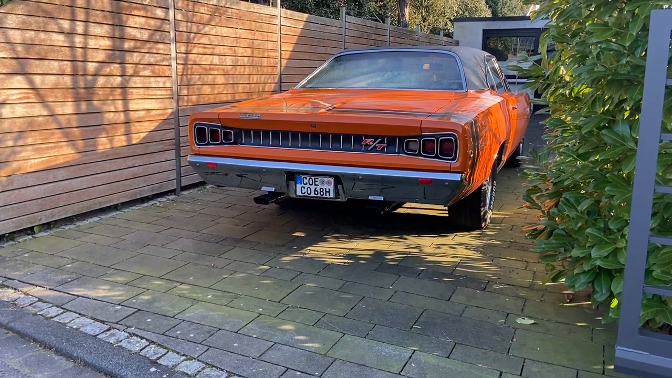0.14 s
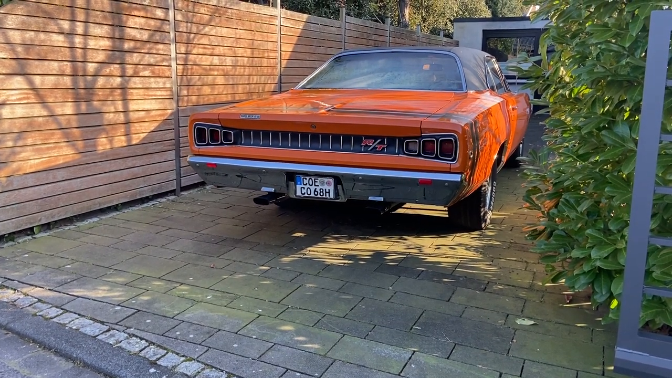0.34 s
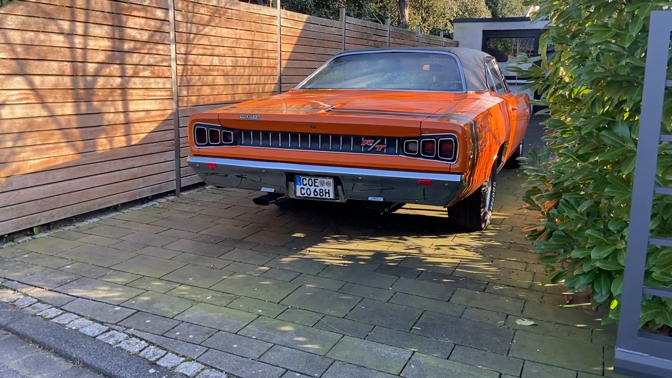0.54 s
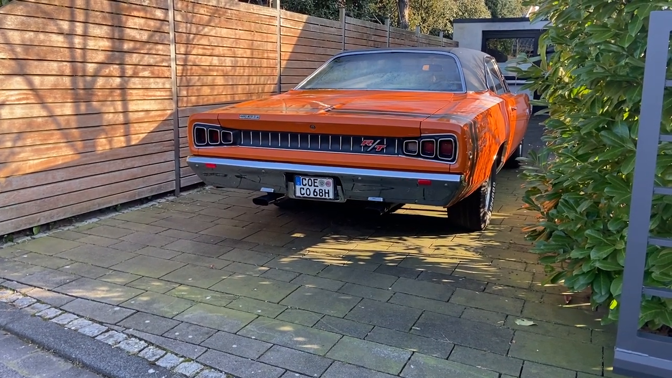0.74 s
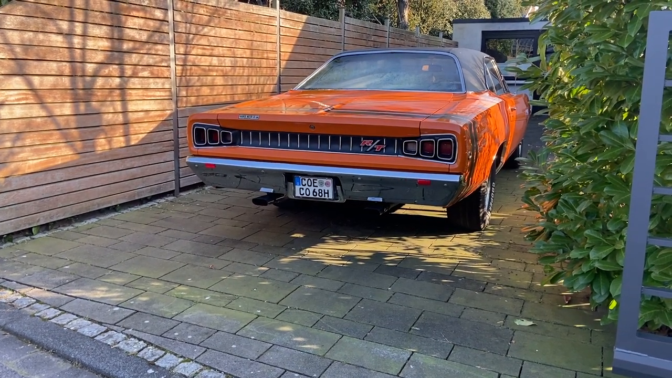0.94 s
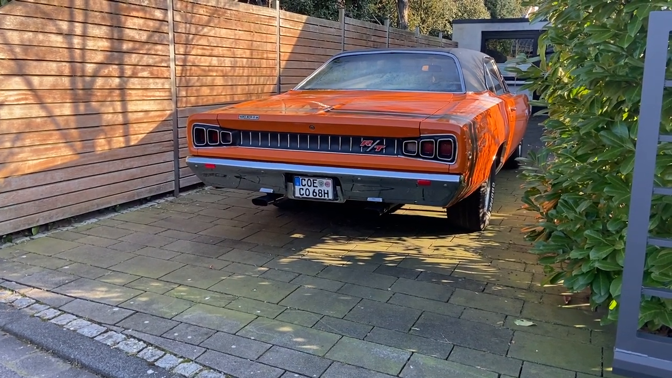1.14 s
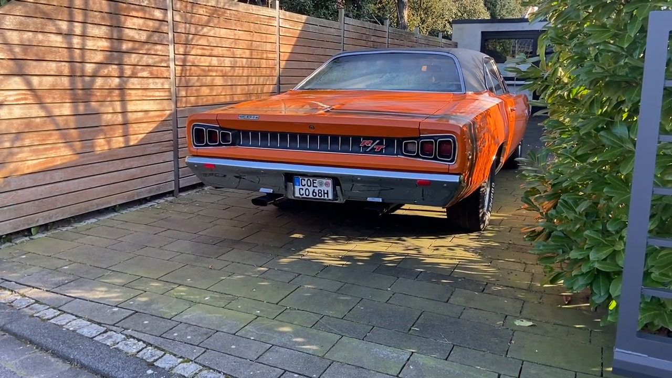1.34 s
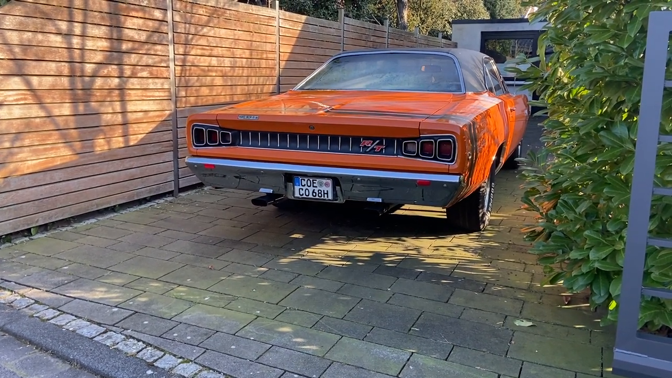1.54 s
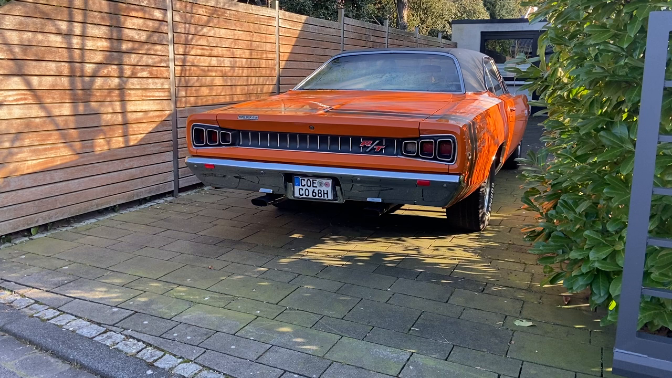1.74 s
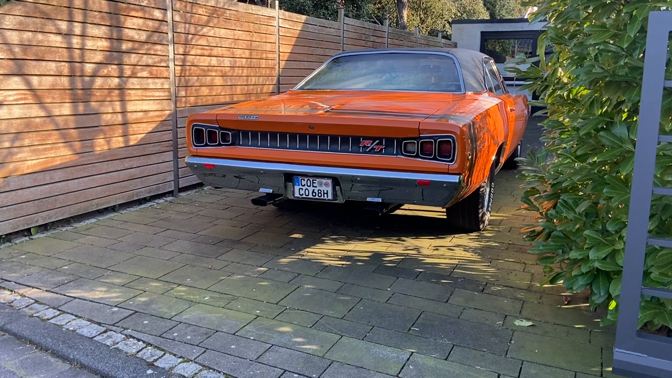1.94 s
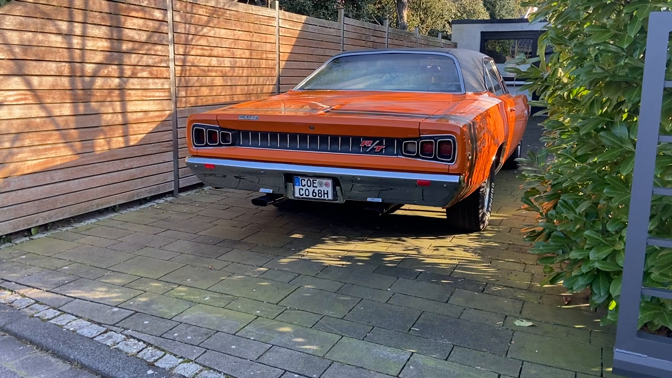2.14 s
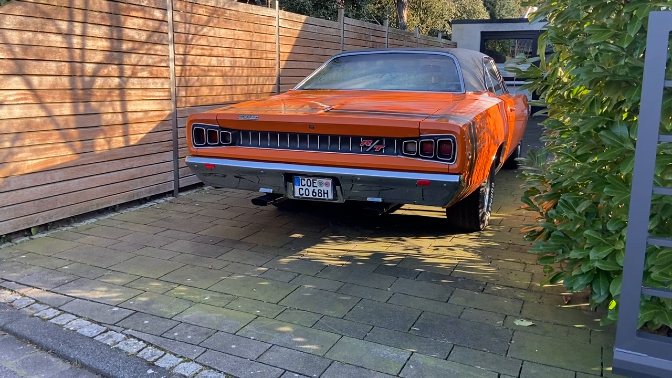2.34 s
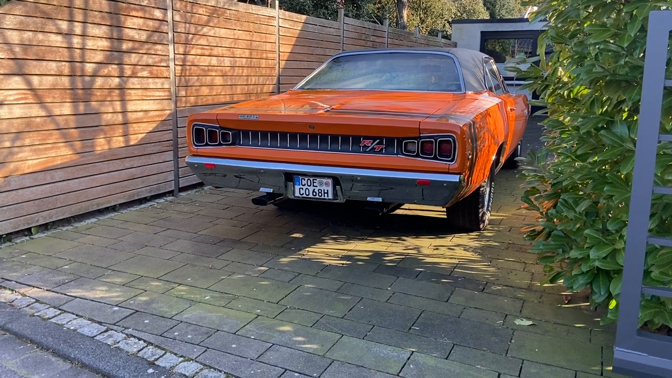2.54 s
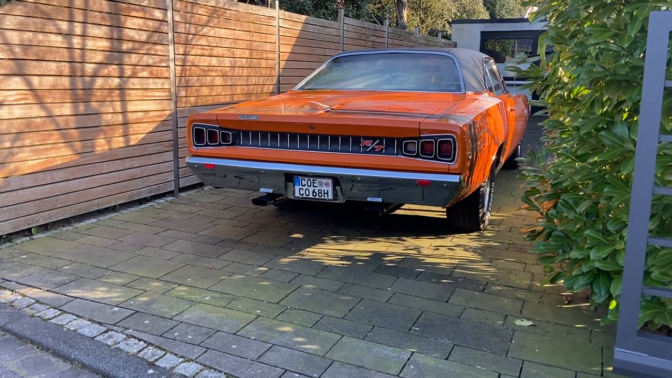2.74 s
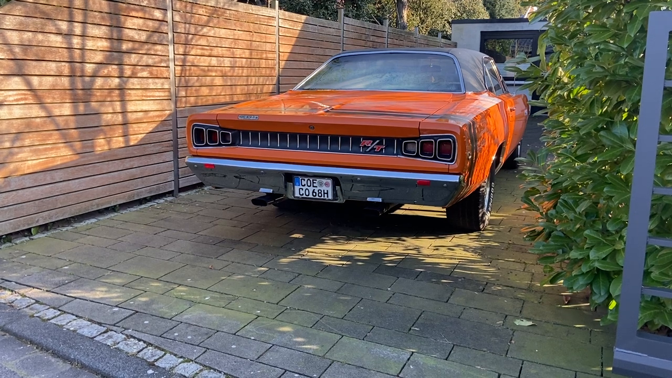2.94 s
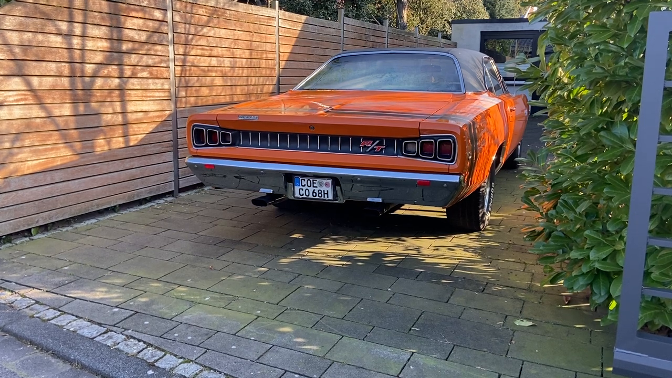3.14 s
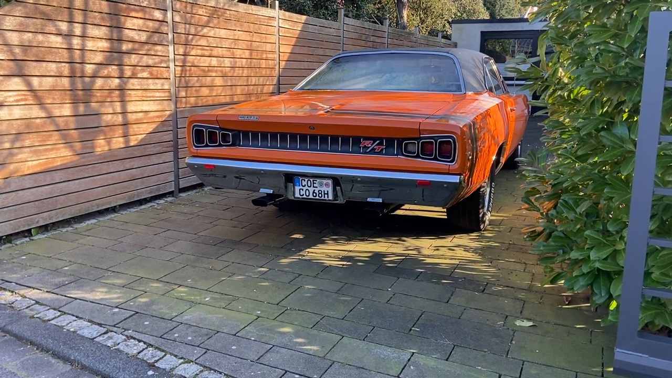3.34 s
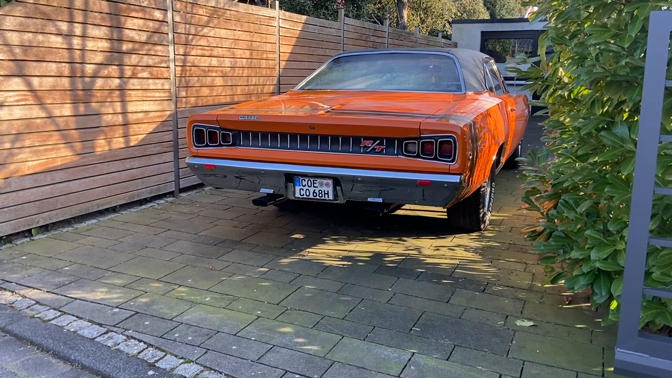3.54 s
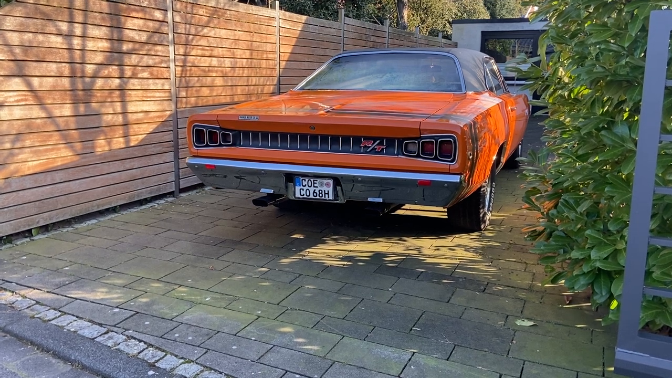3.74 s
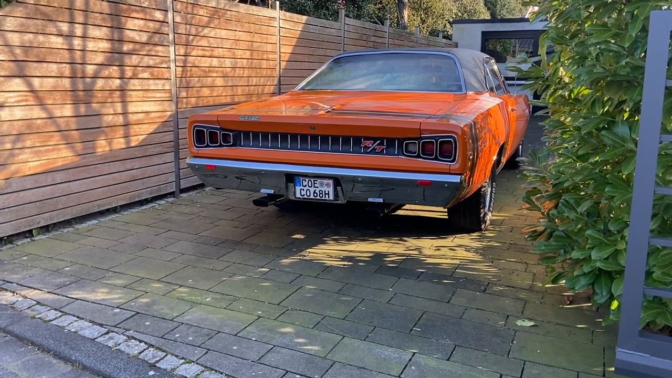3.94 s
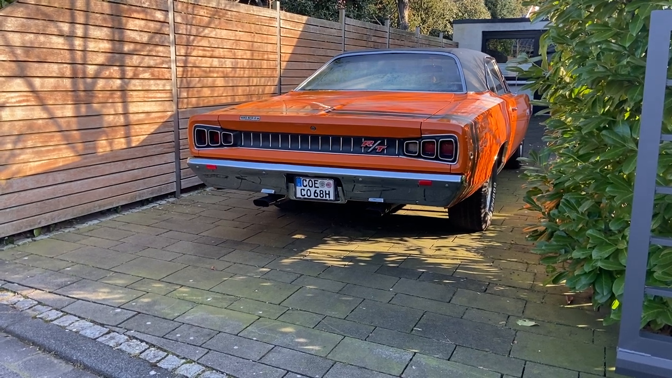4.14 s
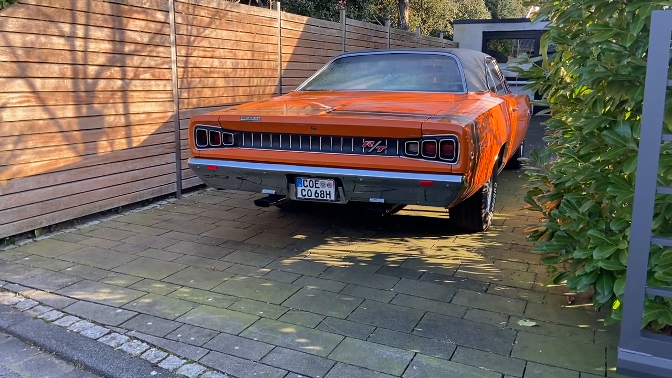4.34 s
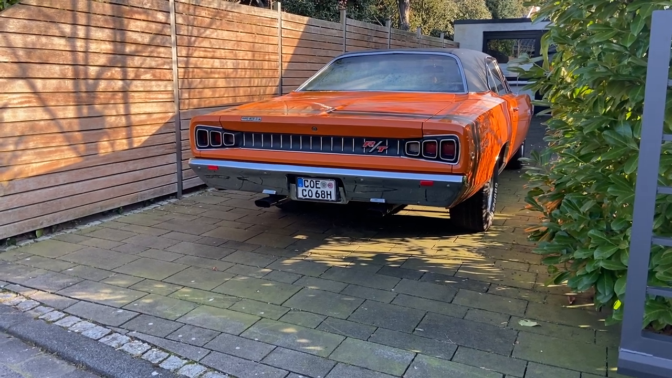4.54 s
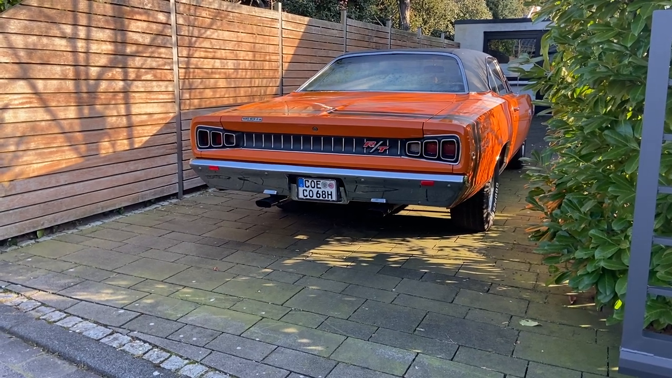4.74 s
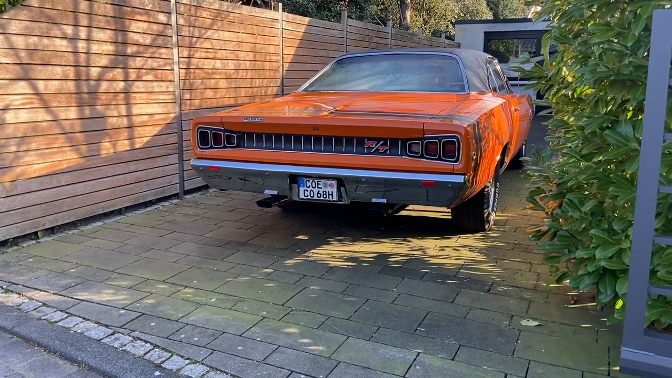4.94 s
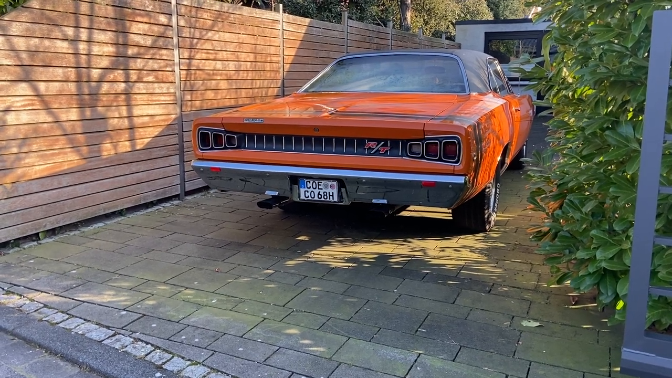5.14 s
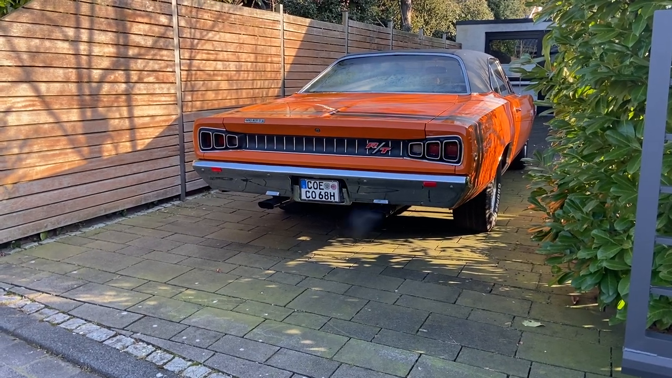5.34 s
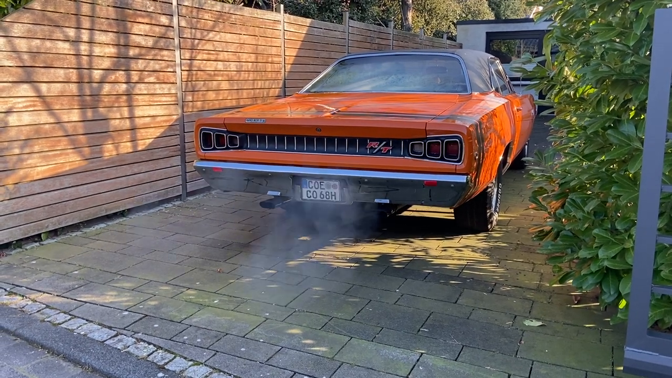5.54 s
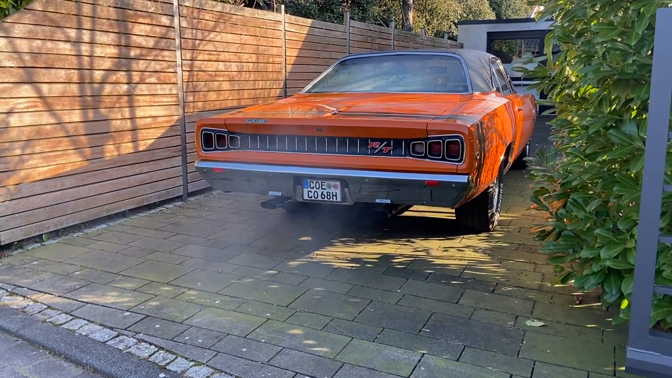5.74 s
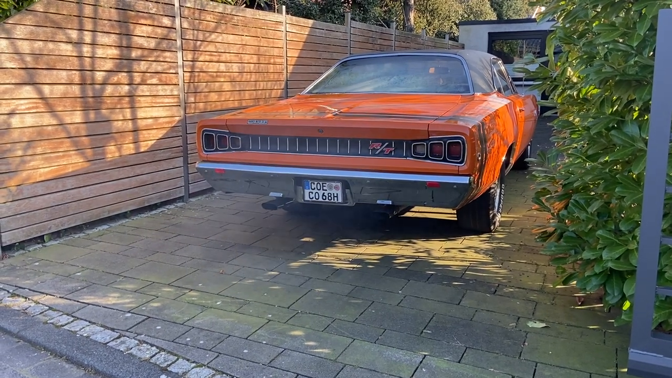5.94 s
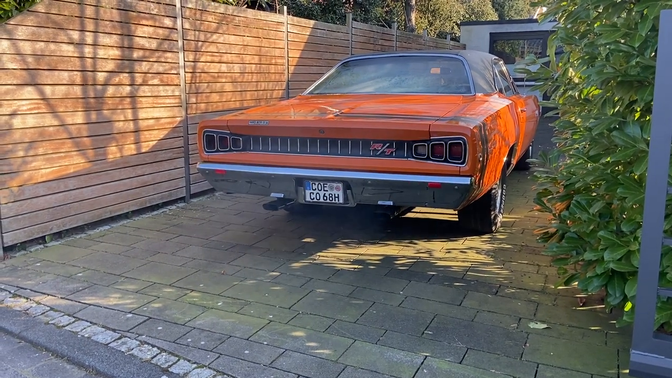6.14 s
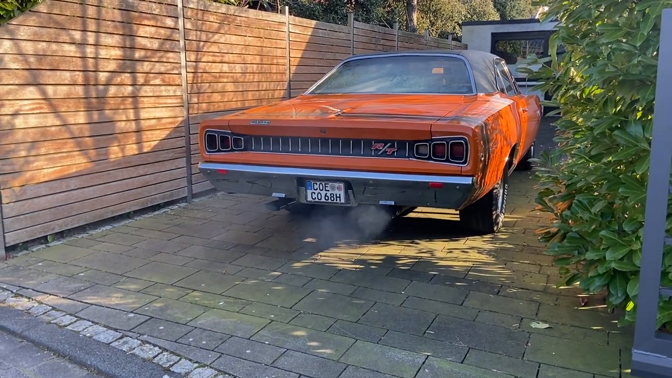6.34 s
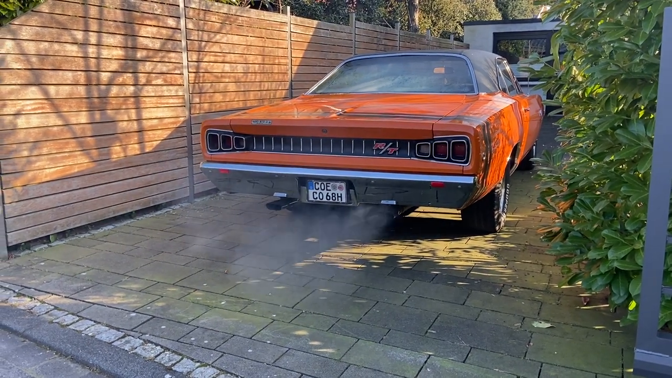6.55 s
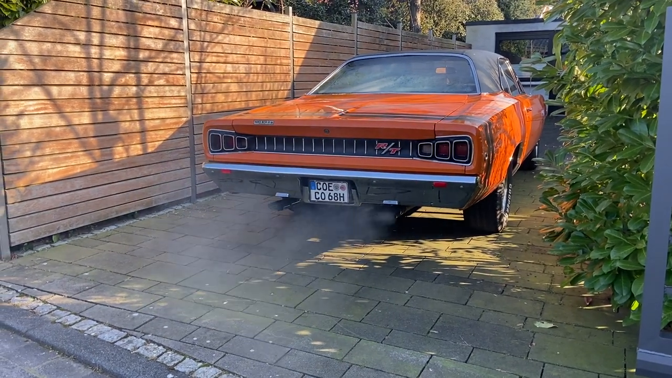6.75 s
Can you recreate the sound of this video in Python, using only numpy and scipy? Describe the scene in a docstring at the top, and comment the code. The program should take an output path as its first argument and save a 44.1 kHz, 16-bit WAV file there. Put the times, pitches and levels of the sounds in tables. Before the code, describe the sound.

Close behind a big V8 car on a paved drive, the starter churns in rapid uneven strokes without a start, then whirrs down with a faint metallic ring. In the quiet, birds whistle over distant traffic while dull pedal knocks and faint rustling come from the car. A small electric pump buzzes briefly. The starter labours again and the engine bursts into a loud, rough, fast idle.

```python
"""A paved drive beside a wooden fence, heard from behind a big V8 through two close microphone ports.
The starter, a gear mesh loaded at each stroke, cranks in vain and runs down. Birds, gliding near sines,
sing over low background noise, mostly far traffic, while pedal knocks ring the floor pan. A small electric
pump buzzes in harmonics of its stroke rate. The starter cranks again and the cold engine fires into a
lumpy fast idle: uneven firings ring the pipe modes and gate noise of gas flow."""
import sys
import numpy as np
from scipy import signal
from scipy.fft import rfft, irfft
from scipy.io import wavfile

SR = 44100
rng = np.random.default_rng(int(sys.argv[2]) if len(sys.argv) > 2 else 0)


def volts(x):
    """Linear amplitude factor 10**(x/20) for a level x in dB, scalar or array-like."""
    e = np.asarray(x, float) / 20
    return 10 ** e


def to_wav(s):
    """Save 16-bit WAV."""
    ch = np.atleast_2d(s).T  # columns
    pcm = np.round(np.clip(ch, -1, 1) * 32767)  # PCM
    wavfile.write(sys.argv[1], SR, pcm.astype(np.int16))


N = 298998
T = np.arange(N) / SR
HZ = np.fft.rfftfreq(N, 1 / SR) + 1   # one up, so that its logarithm exists


def rms_one(x):
    """Scale to unit rms."""
    return x / np.sqrt(np.mean(x ** 2) + 1e-20)


def in_time(rows):
    """Columns on the sample grid, then a gate that fades in and out at the table's ends."""
    s, *columns = np.transpose(rows)
    gate = np.clip(np.minimum(T - s[0], s[-1] - T + .02) / .012, 0, 1)
    return [np.interp(T, s, c) for c in columns] + [gate]


def noise(spectrum, treble_db=-7.5):
    """Noise of rms 1; a spectrum beyond 7 kHz falls by treble_db per octave from its third-last row."""
    hz, db = np.transpose(spectrum)
    shape_db = np.interp(np.log(HZ), np.log(hz + 1), db)
    if hz[-1] > 7000:
        slope_db = db[-3] + treble_db * np.log2(HZ / hz[-3])
        shape_db = np.where(HZ > hz[-3], slope_db, shape_db)
    return rms_one(irfft(rfft(rng.standard_normal(N)) * volts(shape_db), N))


def drift(rate):
    """Slow chance of rms 1: white noise through two equal low-passes at rate Hz."""
    r = np.exp(-2 * np.pi * rate / SR)
    return rms_one(signal.lfilter([1], [1, -2 * r, r * r], rng.standard_normal(N + SR))[SR:])


def ring(clicks, hz, t60):
    """A unit click sets a sine of height 1 ringing, 60 dB down after t60 seconds."""
    r, w = volts(-60 / (t60 * SR)), 2 * np.pi * hz / SR
    return signal.lfilter([0, np.sin(w)], [1, -2 * r * np.cos(w), r * r], clicks + 1e-18)


def impulses(times, sizes):
    """Single-sample clicks at given seconds."""
    out = np.zeros(N)
    np.add.at(out, np.clip((np.asarray(times) * SR).astype(int), 0, N - 1), sizes)
    return out


def swell(clicks, rise_s, fall_s):
    """Each click becomes an envelope that rises and dies exponentially."""
    fall, rise = np.exp(-1 / (fall_s * SR)), np.exp(-1 / (rise_s * SR))
    clicks = signal.lfilter([1], [1, -fall], clicks + 1e-18)
    return signal.lfilter([1 - rise], [1, -rise], clicks + 1e-18)


def tone(hz):
    """Sine of rms 1 on a moving pitch."""
    return np.sqrt(2) * np.sin(2 * np.pi * np.cumsum(hz) / SR)


def beats(per_s, jitter_s, spread_db):
    """One click per cycle, uneven in time and strength."""
    s = T[1:][np.diff(np.floor(np.cumsum(per_s) / SR)) > 0]
    chance = rng.standard_normal((len(s), 2))
    return impulses(s + jitter_s * chance[:, 0], volts(spread_db * chance[:, 1]))


def held(start_s, end_s, rise_s, fall_db_per_s):
    """Fades in, holds at one, then dies at a steady rate."""
    return np.clip((T - start_s) / rise_s, 0, 1) * volts(-fall_db_per_s * np.clip(T - end_s, 0, 1))


def humps(s, width_s, db):
    """Sum of bell-shaped swells."""
    return sum(volts(d) * np.exp(-((T - a) / w) ** 2) for a, w, d in np.broadcast(s, width_s, db))


# Low background noise, mostly far traffic; the swell near 4.0 s comes with the pump.
# Each row: time in seconds, level in dB.
OUTDOORS = [(1.8, -47), (2.5, -47.5), (2.59, -46.5), (2.99, -51), (3.19, -55.5), (3.53, -51.5),
            (3.87, -47.5), (4.0, -43), (4.1, -50), (4.55, -47.5)]
# Colour of the low noise. Each row: frequency in Hz, relative density in dB per Hz.
LOW_NOISE = [(15, -47), (25, -25.5), (54, 0.5), (160, -4), (248, 1), (303, -9.5), (470, -28), (500, -30),
             (650, -57.5), (1100, -120)]
# Air colour. Each row: frequency in Hz, relative density in dB per Hz.
AIR = [(240, -27.5), (400, 0.5), (926, -5.5), (1250, -14.5), (2690, -26.5), (4440, -19.5), (5420, -36),
       (8000, -37), (10400, -67), (17600, -120)]
# The air noise dips. Each row: time in seconds, width in seconds, depth in dB.
HUSHES = [(3.45, 0.17, -2), (4.469, 0.075, -12)]


def outdoors():
    """Low background, mostly far traffic, and air: coloured noises that waver slowly."""
    low = volts(in_time(OUTDOORS)[0] + 2.7 * drift(7)) * noise(LOW_NOISE)
    dips_db = sum(db * humps(s, width_s, [0]) for s, width_s, db in HUSHES)
    air = volts(-60.5 + dips_db + 1.75 * drift(14)) * noise(AIR, treble_db=-16)
    return low + air


# Bird notes. Each row: start in seconds, length in seconds, from Hz, to Hz, level in dB.
BIRDS = [(1.715, 0.06, 6940, 7040, -68), (1.82, 0.19, 8150, 8110, -64), (1.88, 0.16, 3050, 3000, -78),
         (2.02, 0.046, 8100, 7360, -70), (2.06, .045, 7450, 4750, -59), (2.1, 0.2, 5030, 4530, -61),
         (2.25, 0.04, 4200, 3450, -55.5), (2.29, 0.053, 3400, 3550, -54.5), (2.355, 0.043, 3545, 3420, -56),
         (2.375, 0.089, 2610, 2620, -66.5), (2.99, .05, 3700, 3910, -59), (3.04, 0.071, 4670, 4230, -56.5),
         (3.05, 0.18, 3936, 4190, -61.5), (3.1, 0.138, 4520, 4400, -70), (3.27, .09, 2980, 3430, -66),
         (3.36, 0.049, 3447, 3490, -53.5), (3.41, 0.028, 3700, 3870, -65), (3.48, 0.11, 4200, 4430, -59),
         (3.565, 0.053, 5140, 5220, -70.5), (3.62, 0.096, 4670, 4470, -66)]
# Quick twitter. Each row: start in seconds, length in seconds, from Hz, to Hz, level in dB.
TWITTER = [(2.71, 0.046, 5400, 5500, -71), (2.72, .07, 6000, 6150, -68), (2.77, .09, 6300, 7650, -71.5),
           (2.8, 0.055, 5300, 5880, -67), (2.81, .05, 6000, 6030, -67), (2.85, .08, 8000, 7670, -69),
           (2.86, 0.065, 8400, 8600, -64)]


def birds():
    """Gliding near sines that tremble, the twitter more widely, with a blurred echo from the trees."""
    note_fade = 0.12   # share of a note spent fading in, and again out
    trees_db, trees_t60_s = -39, .55
    out, flutter = np.zeros(N), volts(3.5 * drift(32))
    for notes, tremble in ((BIRDS, 0.0096 * drift(150)), (TWITTER, .035 * drift(94))):
        for s, length_s, from_hz, to_hz, db in notes:
            at = slice(int(s * SR), int((s + length_s) * SR))
            part = (T[at] - s) / length_s
            fade = np.clip(np.minimum(part, 1 - part) / note_fade, 0, 1)
            glide_hz = from_hz + (to_hz - from_hz) * part
            out[at] += volts(db) * fade * flutter[at] * tone(glide_hz * (1 + tremble[at]))
    trees = rng.standard_normal(SR // 2) * volts(-60 * T[:SR // 2] / trees_t60_s)
    return out + volts(trees_db) * signal.fftconvolve(out, trees)[:N]


# Rustling inside the car. Each row: time in seconds, width in seconds, middle in dB, treble in dB.
RUSTLE = [(2.29, .05, -71, -70), (2.54, 0.075, -64, -59.5), (2.76, .06, -85, -68), (2.97, 0.046, -59, -71),
          (3.07, 0.062, -62, -85), (3.16, 0.05, -67, -65.5)]
# Treble colour. Each row: frequency in Hz, relative density in dB per Hz.
BRUSH = [(3500, -14), (5200, -8), (7500, -12), (9000, -29.5), (12000, -60), (20000, -90)]


def rustle():
    """Faint brushing while the driver moves: noise swells in the middle and the treble."""
    s, width_s, mid_db, high_db = np.transpose(RUSTLE)
    middle = humps(s, width_s, mid_db) * noise(ROAR)
    treble = humps(s, width_s, high_db) * noise(BRUSH)
    return volts(2.3 * drift(53)) * (middle + treble)


# Pedal and linkage knocks. Each row: time in seconds, relative thud in dB, relative scuff in dB.
KNOCKS = [(1.947, -37, -75), (2.098, -44.5, -55.5), (2.197, -47, -72), (2.242, -35, -55.5),
          (2.297, -41, -74), (2.335, -37, -64), (2.403, -39, -66), (2.495, -53, -43), (2.565, -40, -50.5),
          (2.586, -58, -40), (2.633, -46, -43), (2.794, -39, -77), (2.929, -31, -49.5),
          (3.065, -38.5, -62.5), (3.181, -42, -49), (3.337, -52, -55.5), (3.62, -50.5, -63),
          (3.676, -65, -66)]
# Scuff colour. Each row: frequency in Hz, relative density in dB per Hz.
SCUFF = [(180, -30.5), (300, -2.5), (527, -8.5), (621, -15), (1060, -11), (1580, -22), (5520, -36.5),
         (8000, -37), (10400, -76), (17600, -120)]


def knocks():
    """A soft push rings the floor pan; the linkage scuffs for a moment."""
    s, thud_db, scuff_db = np.transpose(KNOCKS)
    pan = [(80.5, 3.5, 0.17), (150, -2.5, 0.11), (257, -10, 0.047)]   # (Hz, dB, t60 s)
    share = volts(rng.normal(0, 3.8, (len(s), 3)))   # each knock excites the modes differently
    thud = np.zeros(N)
    for k, (hz, db, t60) in enumerate(pan):
        thud += volts(db) * ring(impulses(s, volts(thud_db) * share[:, k]), hz, t60)
    scuff = swell(impulses(s - .008, volts(scuff_db)), rise_s=0.0064, fall_s=0.029)
    scuff = scuff * volts(3.2 * drift(120)) * noise(SCUFF)
    return thud + volts(-0.5) * scuff


# Buzz harmonics. Each row: multiple of the stroke rate, relative level in dB.
PUMP_ORDERS = [(1, -7), (2, -6), (3, -4.5), (4, -4.5), (5, -4.5), (6, -3), (7, -2), (8, -8), (9, -0.5),
               (10, -10), (11, -6.5), (12, -11), (13, -11), (14, -11), (15, -13), (16, -7.5), (17, -7),
               (18, -6), (19, -12), (20, -18), (21, -19), (22, -14), (23, -19), (24, -22), (25, -20),
               (26, -22)]
# Flow noise through tank and floor. Each row: frequency in Hz, relative density in dB per Hz.
PUMP_BODY = [(88, -23), (150, -5), (278, -22), (307, -22), (400, 4), (442, -6.5), (617, 2), (659, -15),
             (1200, -7), (2110, -25.5), (8000, -36.5), (10400, -71), (17600, -120)]
# Hiss colour. Each row: frequency in Hz, relative density in dB per Hz.
PUMP_HISS = [(3000, -25), (5000, -8), (6500, -3), (8000, 7), (10400, 0), (17600, 0)]


def pump():
    """A harmonic buzz that starts slow and soft and settles, with flow noise swelling on each stroke."""
    on_s, off_s, settle_s = 3.8, 4.44, 0.1513
    strokes_per_s, lag_per_s = 68.6, 2.2
    buzz_db, lag_db, flow_db, hiss_db = -40.5, 12, -47, -64
    lag = np.exp(-np.clip(T - on_s, 0, None) / settle_s)
    gate = held(on_s, off_s, rise_s=0.026, fall_db_per_s=270)
    at = slice(int(on_s * SR), int((off_s + .3) * SR))
    turn = 2 * np.pi * np.cumsum(strokes_per_s - lag_per_s * lag + 0.37 * drift(5.02)) / SR
    buzz = np.zeros(N)
    for order, db in PUMP_ORDERS:
        phase = rng.uniform(0, 2 * np.pi)
        buzz[at] += volts(db + 1.5 * drift(6.9)[at]) * np.sin(order * turn[at] + phase)
    buzz[at] = rms_one(buzz[at])
    hiss = volts(hiss_db) + humps(3.844, .015, [-63])   # with a spurt as the line fills
    flow = volts(flow_db) * noise(PUMP_BODY) + hiss * noise(PUMP_HISS, treble_db=-6.0)
    return gate * (volts(buzz_db - lag_db * lag) * buzz + (1 + .3 * np.sin(turn)) * flow)


# Cranking attempts. Each row: from seconds, to seconds, grind in dB, chassis rumble in dB.
ENGAGED = [(-.1, 1.271, -31.5, -44), (4.582, 5.274, -30.5, -41)]
# Gear grind colour. Each row: frequency in Hz, relative density in dB per Hz.
GRIND = [(150, -39), (250, -19), (571, -12.5), (786, -13), (1200, -2.5), (1670, -12.5), (2940, -13.5),
         (3350, -23.5), (4410, -21), (8000, -28), (10400, -71.5), (17600, -120)]
# Chassis rumble colour. Each row: frequency in Hz, relative density in dB per Hz.
RUMBLE = [(15, -48), (25, -15), (48, 2.5), (70, 7), (166, -4.5), (236, -15.5), (300, -9), (390, -20),
          (660, -120)]
# The block rocks on its mounts. Each row: time in seconds, level in dB.
LURCHES = [(.83, -34), (1.21, -21.5), (4.645, -45), (5.0, -46.5), (5.165, -31.5), (5.25, -29.5)]
LET_GO_DB_PER_S = 132   # the noise sinks as the pinion lets go


def cranking():
    """Gear grind and chassis rumble hold through each attempt; after the first the armature coasts."""
    grind = noise(GRIND, treble_db=-9.5) * volts(2.7 * drift(25))
    rumble = noise(RUMBLE) * volts(3.07 * drift(8.9))
    coast = held(ENGAGED[0][0], 1.663, rise_s=.01, fall_db_per_s=168.5)
    coast = coast * volts(1.8 * drift(140))   # the freewheeling pinion rattles unevenly
    whirr = noise(AIR, treble_db=-16)
    out = coast * (volts(-53) * grind + volts(-36) * rumble + volts(-44) * whirr)
    for a, b, grind_db, rumble_db in ENGAGED:
        out += held(a, b, .012, LET_GO_DB_PER_S) * (volts(grind_db) * grind + volts(rumble_db) * rumble)
    s, db = np.transpose(LURCHES)
    return out + humps(s, 0.023, db) * (rumble + volts(-3) * noise(LOW_NOISE))


# Starter strokes: cylinders passing compression, and the pinion engaging at 4.593 s.
# Each row: time in seconds, relative peak in dB, nominal mesh pitch in Hz, relative treble in dB,
# slap against the peak in dB.
STROKES = [(0.055, -13, 1230, -32, -2), (0.169, -14, 1243, -33, 0.5), (0.301, -12, 1229, -31.5, -2.5),
           (0.428, -14.5, 1227, -30.5, -2.5), (0.546, -18, 1218, -32, -1.5), (0.677, -17.5, 1215, -30, 1.5),
           (0.8, -14.5, 1263, -32, 0), (0.93, -15, 1218, -33, 0), (1.074, -14.5, 1230, -33, -0.5),
           (1.188, -12, 1200, -30.5, -6.5), (4.593, -53, 1248, -34, -9), (4.774, -20.5, 1002, -37, -25),
           (5.0, -15.5, 1078, -32, -22), (5.141, -15.5, 1204, -30.5, 1)]
# Armature whine labouring from rest. Each row: time in seconds, pitch in Hz, level in dB.
LABOUR = [(4.6, 648, -52), (4.66, 652.3, -41), (4.725, 654.5, -34), (4.735, 715, -44.5), (4.75, 809, -29.5),
          (4.775, 969, -27), (4.82, 950, -28), (4.84, 832, -31), (4.88, 809, -44)]
# Bell-housing modes. Each row: frequency in Hz, relative level in dB.
HOUSING = [(662.1, -36), (694.4, -74.5), (759.0, -34.5), (807.5, -33), (1098, -39), (1157, -46),
           (1222, -47.5), (1324, -44), (1394, -28), (1523, -38), (1685, -42.5), (1766, -46), (1981, -46),
           (2234, -56), (2676, -43.5), (2864, -28)]
# Ring gear struck at release. Each row: frequency in Hz, relative level in dB, t60 in seconds.
RING_GEAR = [(1025, -34, 2.06), (1240, -44, 1.55), (715, -53, 1.2)]


def starter():
    """At each stroke the gears slap twice and race, then the mesh pitch sags."""
    s, db, top_hz, treble_db, slap_db = np.transpose(STROKES)
    last = np.clip(np.searchsorted(s - .006, T) - 1, 0, None)
    since = np.clip(T - s[last], 0, .085)
    mesh_hz = top_hz[last] * (1.03 - 4.6 * since) * (1 + .05 * drift(190.3))
    load = swell(impulses(s - .002, volts(db)), rise_s=0.013, fall_s=0.026)
    teeth = load * volts(4.5 * drift(120)) * (tone(mesh_hz) + 0.52 * tone(2 * mesh_hz))

    running = sum(held(a, b, 0.0081, LET_GO_DB_PER_S) for a, b, _, _ in ENGAGED)
    chatter = (load + volts(-34) * running) * rng.standard_normal(N)
    shaken = teeth + 1.8 * chatter
    body = np.zeros(N)
    for k, (hz, level_db) in enumerate(HOUSING):
        # a mode falls 60 dB in 170 cycles
        body += volts(level_db) * ring(shaken, hz, 170 / hz) * (-1) ** k

    # backlash is taken up on both flanks, each a short ring of the pinion
    slaps = impulses(s - .001, volts(db + slap_db)) + impulses(s + .0125, volts(db + slap_db + 1.5))
    slap = volts(-22) * ring(ring(slaps, 1270, .016), 1130, .016)
    rasp = swell(impulses(s - .002, volts(treble_db)), rise_s=.002, fall_s=0.048)
    rasp = rasp * noise(GRIND, treble_db=-8.0)
    out = volts(-8.5) * teeth + volts(-13.5) * body + slap + volts(8.5) * rasp

    hz, whine_db, gate = in_time(LABOUR)
    hz = hz * (1 + .014 * drift(62))
    # overtones fade as the armature speeds up
    overtones = volts(-2 - .036 * (hz - LABOUR[0][1])) * (tone(2 * hz) + 1.8 * tone(3 * hz))
    out += gate * volts(whine_db + 5.8 * drift(29)) * (tone(hz) + overtones)

    release = impulses([1.3], 0.7)
    return out + sum(volts(level_db) * ring(release, hz, t60) for hz, level_db, t60 in RING_GEAR)


# First pipe tone, locked to the firing rate at idle. Each row: time in seconds, pitch in Hz, level in dB.
EXHAUST = [(5.25, 94.6, -46), (5.266, 95.5, -8.5), (5.342, 94.66, -18), (5.5, 107, -18.5),
           (5.552, 95.24, -24), (5.628, 94.95, -12), (5.662, 94.45, -28), (5.726, 101.3, -14.5),
           (5.804, 104, -9.5), (5.918, 94.96, -11.5), (6.028, 101.9, -11), (6.132, 95.9, -13),
           (6.416, 104.8, -8.5), (6.502, 97.5, -14), (6.69, 104.5, -10.5), (6.78, 114.6, -17)]
# Weak cold firings that let the boom sag. Each row: time in seconds, depth from 0 to 1, width in seconds.
STUMBLES = [(5.585, 0.5, 0.016), (5.736, 0.6, 0.0083), (5.82, 0.9, 0.016), (5.981, 1, 0.015),
            (6.065, 1, 0.013), (6.14, 0.8, 0.0084), (6.395, 1, .013), (6.488, 1, 0.011), (6.63, 1, 0.009)]
# Second pipe tone. Each row: time in seconds, width in seconds, level in dB, pitch in Hz.
SECOND_SWELLS = [(5.285, 0.016, -14.5, 178), (5.4, .03, -21.5, 156.5), (5.51, 0.055, -16.5, 194.8),
                 (5.665, 0.046, -16, 186.3), (5.96, .03, -29, 185.3), (6.1, 0.028, -35, 168.3),
                 (6.3, .05, -24.5, 178.3), (6.47, 0.058, -17.5, 177.7), (6.58, 0.097, -20.5, 181.3),
                 (6.74, 0.027, -22, 181.6)]
# Lope swells. Each row: time in seconds, width in seconds, level in dB.
LOPE_SWELLS = [(5.285, 0.016, -10), (5.63, .03, -36), (6.09, 0.089, -19), (6.28, 0.059, -26.5)]
# Sharp firings. Each row: time in seconds, relative peak in dB.
POPS = [(5.256, -4), (5.268, -6), (5.289, -2.5), (5.309, -5.5), (5.348, -2.5), (5.401, -4), (5.429, -7),
        (5.519, -7.5), (5.549, -9.5), (5.581, -13), (5.659, -12.5), (5.879, -14), (5.925, -14.5),
        (5.987, -19), (6.239, -22), (6.297, -11.5), (6.333, -11.5), (6.402, -14.5), (6.432, -11.5),
        (6.539, -10), (6.574, -11.5), (6.741, -14.5)]
# Upper pipe modes. Each row: frequency in Hz, width in Hz, relative level in dB.
PIPE = [(211.4, 134, 0.5), (289, 23, 3), (356.3, 35, -4.5), (453, 29, -10.5), (474.5, 18, -7),
        (560, 18.5, -2.5), (672, 50, -10.5), (796, 13, -21.5)]
# Gas flow through the tailpipes. Each row: time in seconds, relative level in dB.
FLOW = [(5.25, -21), (5.258, -22), (5.292, -16), (5.348, -17.5), (5.382, -24.5), (5.41, -17.5),
        (5.734, -30), (6.19, -36), (6.2, -42), (6.284, -30.5), (6.302, -25), (6.392, -35), (6.45, -24.5),
        (6.558, -27), (6.578, -23), (6.626, -30), (6.774, -27.5), (6.78, -31)]
# Roar colour, also the middle of the rustle. Each row: frequency in Hz, relative density in dB per Hz.
ROAR = [(410, -19), (700, -9), (1170, -3), (1270, -9.5), (1390, -2), (1580, 0.5), (2400, -22.5),
        (3120, -62), (5280, -120)]
# Jet hiss colour. Each row: frequency in Hz, relative density in dB per Hz.
JET = [(1290, -35), (2200, -11.5), (3620, -9), (4640, -5), (5140, -8), (7140, -11.5), (8000, -14),
       (10400, -32), (17600, -120)]


def engine():
    """Two low pipe tones boom; uneven cold firings ring the upper pipe modes and gate the gas noise."""
    catch_s, spin_up_s, catch_speed = 5.33, .17, .62   # speed as a share of the idle rate
    hz, db, gate = in_time(EXHAUST)
    flow_db = in_time(FLOW)[0] - np.mean(FLOW, axis=0)[1]
    boom = volts(db + 1.5 * drift(25)) * tone(hz * (1 + .04 * drift(20)))
    for s, depth, width_s in STUMBLES:
        boom *= 1 - depth * np.exp(-((T - s) / width_s) ** 2)
    s, width_s, db, second_hz = np.transpose(SECOND_SWELLS)
    second = (volts(-25) + humps(s, width_s, db)) * volts(3.3 * drift(29))
    boom += second * tone(np.interp(T, s, second_hz) * (1 + .035 * drift(25.3)))
    # the banks fire out of step
    lope = (volts(-35.5) + humps(*np.transpose(LOPE_SWELLS))) * volts(1.3 * drift(14))
    lope = lope * tone(60 * (1 + 0.061 * drift(8.4)))

    speed = catch_speed + (1 - catch_speed) * np.clip((T - catch_s) / spin_up_s, 0, 1)
    s, pop_db = np.transpose(POPS)
    firings = beats(hz * speed, jitter_s=0.00056, spread_db=4.5)
    firings = firings + impulses(s, volts(pop_db + 12))   # sharp firings also kick the pipe modes
    drive = firings + 0.053 * rng.standard_normal(N)
    bark = np.zeros(N)
    for k, (mode_hz, width, mode_db) in enumerate(PIPE):
        bark += volts(mode_db) * width * ring(drive, mode_hz, 2.3 / width) * (-1) ** k
    surge_db = 5.5 * humps(5.52, 0.1, [0])   # the pipes bark harder as the revs flare
    bark = volts(-21.5 + 0.75 * flow_db + surge_db) * rms_one(bark)

    blast = rms_one(swell(firings, rise_s=0.0019, fall_s=0.0033) + 0.85)
    roar = volts(-28 + 0.91 * flow_db) * noise(ROAR)
    dulling_db = 1.5 * (T - catch_s) * gate   # the hiss dulls as the idle settles
    jet = volts(-29.5 + 1.08 * flow_db - dulling_db + 0.63 * drift(37.1)) * noise(JET)
    crack = swell(impulses(s, volts(pop_db)), rise_s=0.0008, fall_s=0.0023)
    crack = crack * volts(-8.5) * (noise(ROAR) + 0.41 * noise(JET))
    return gate * (boom + lope + bark + blast * (roar + jet)) + crack


# Wash from fence and hedge. Each row: frequency in Hz, level in dB.
SCATTER = [(100, -18.5), (500, -11), (1500, -5), (3000, 0), (6000, -4.5), (12000, -21)]


def scene():
    """Direct sound reaches both ports alike; fence and hedge scatter a different wash to each."""
    direct = outdoors() + birds() + rustle() + knocks() + pump() + cranking() + starter() + engine()
    wash = rng.standard_normal((2, SR // 4)) * volts(-60 * T[:SR // 4] / 0.12)   # t60 0.12 s
    wash = rfft(wash / np.linalg.norm(wash, axis=1, keepdims=True), N)
    hz, db = np.transpose(SCATTER)
    scatter = volts(np.interp(np.log(HZ), np.log(hz), db))
    return irfft(rfft(direct) * (1 + scatter * wash), N)


def band_limit(x):
    """A steep low-pass at the top of the band."""
    return signal.sosfilt(signal.butter(12, 16480, fs=SR, output="sos"), x)


# Phase between the microphone ports. Each row: frequency in Hz, lead of the left in radians.
PORT_LEAD = [(0, 0), (1720, -0.5), (2330, 0.8), (3360, 0.8), (5940, -0.6), (6890, 0.2), (8790, -3.0),
             (9560, -3.3), (10400, -5.9), (11600, -6.5), (12600, -9.1), (13800, -9.5), (14600, -12.3),
             (16000, -12.7)]
# Balance of the ports. Each row: frequency in Hz, left minus right in dB.
PORT_BALANCE = [(60, 0.0), (130, 0.0), (290, 0.0), (640, -0.5), (1410, -0.5), (3100, 1.0), (6820, 3.0),
                (15000, 0.0)]


def record(dry):
    """The ports differ in phase and level; treble stops at 15.8 kHz, peaks are rounded, deep bass is cut."""
    lead = np.interp(HZ, *np.transpose(PORT_LEAD)) / 2
    tilt_db = np.interp(HZ, *np.transpose(PORT_BALANCE)) / 2
    sign = np.array([[1], [-1]])   # left, right
    response = (HZ < 15800) * volts(sign * tilt_db) * np.exp(1j * sign * lead)
    ports = irfft(rfft(dry) * response, N)
    rounded = 0.96 * np.tanh(ports / 0.99)
    low_cut = signal.butter(2, 30, "high", fs=SR, output="sos")
    mix = signal.sosfilt(low_cut, rounded)
    return band_limit(mix)


dry = scene()
out = record(dry)
to_wav(out)
```